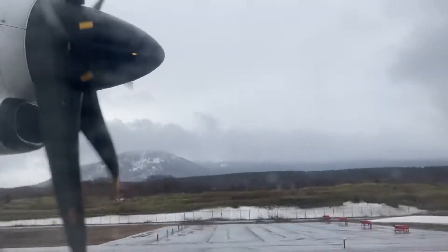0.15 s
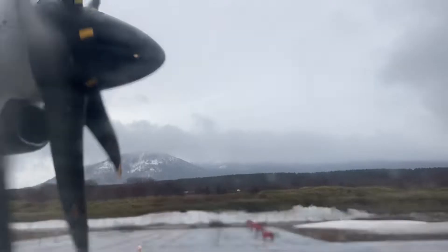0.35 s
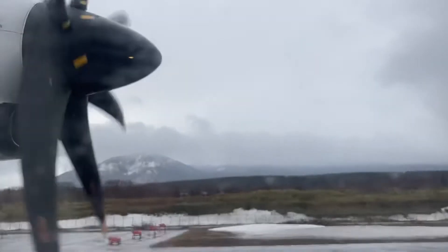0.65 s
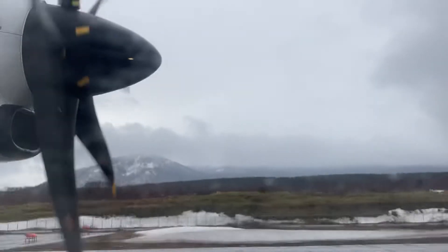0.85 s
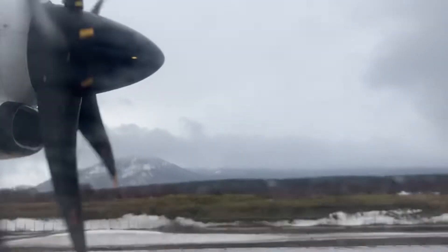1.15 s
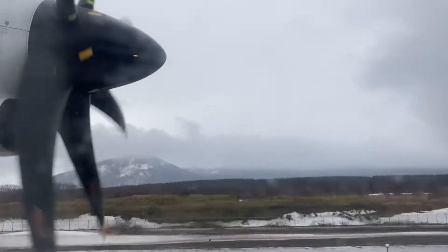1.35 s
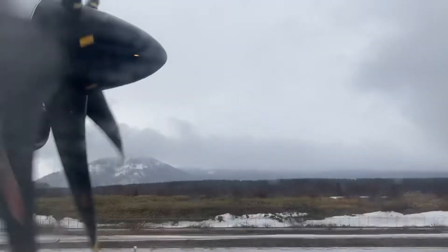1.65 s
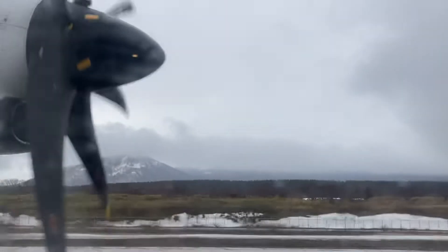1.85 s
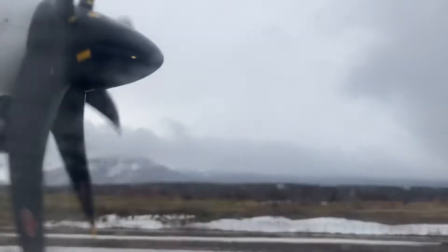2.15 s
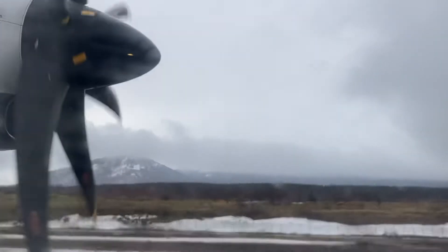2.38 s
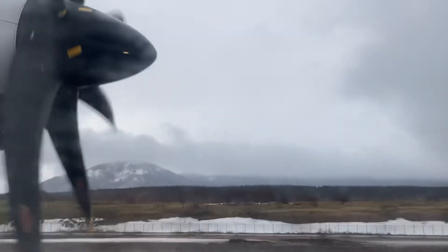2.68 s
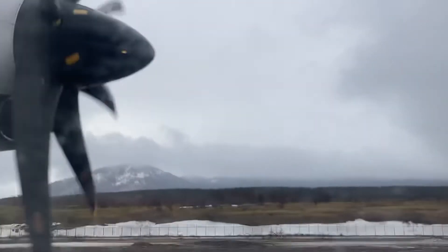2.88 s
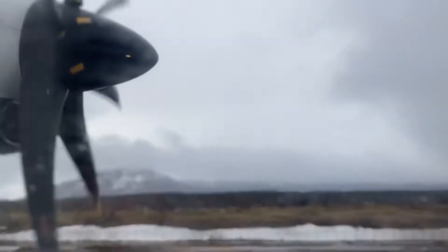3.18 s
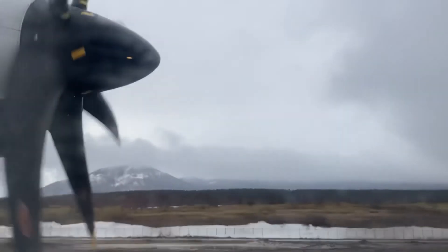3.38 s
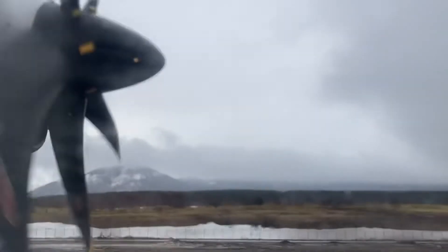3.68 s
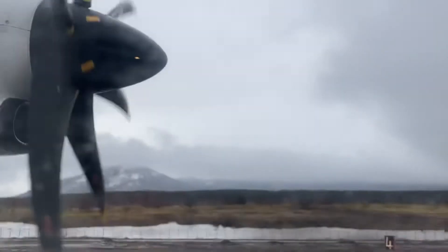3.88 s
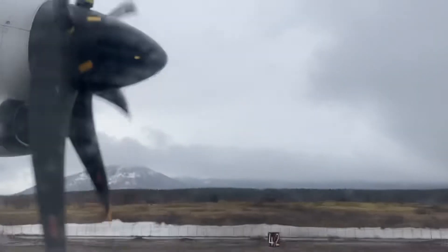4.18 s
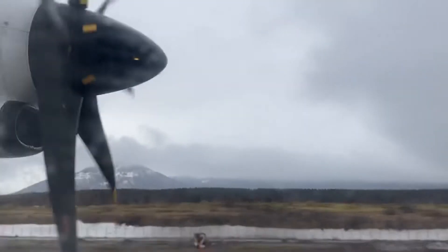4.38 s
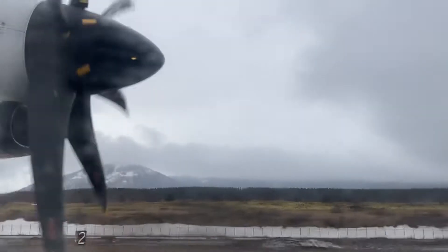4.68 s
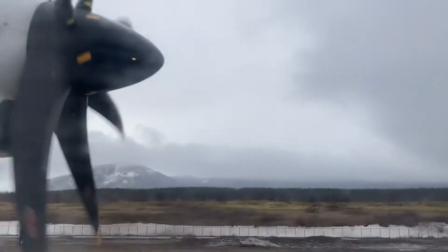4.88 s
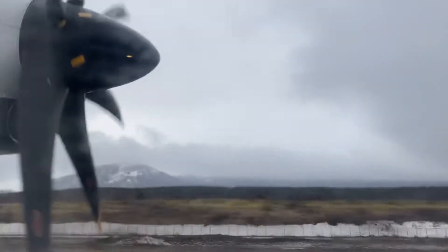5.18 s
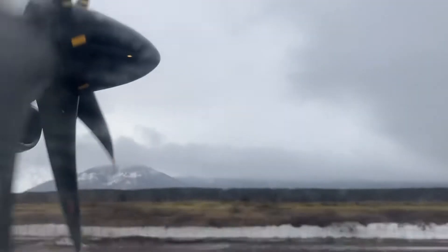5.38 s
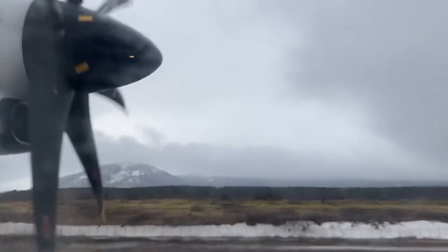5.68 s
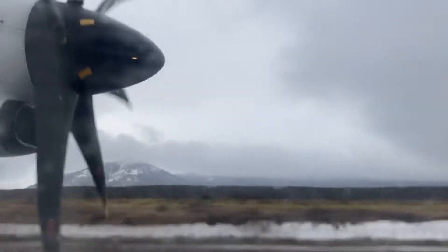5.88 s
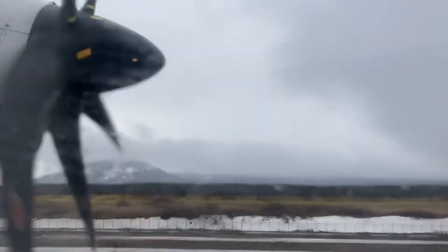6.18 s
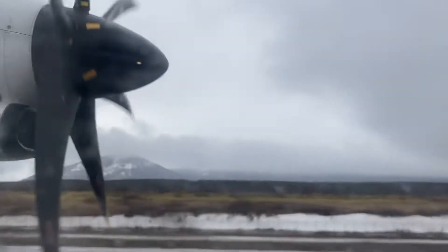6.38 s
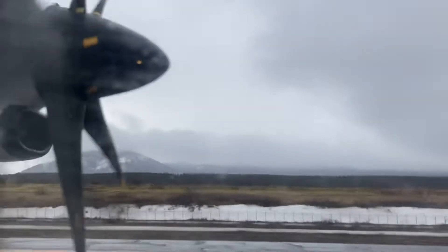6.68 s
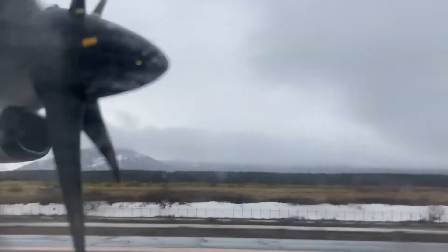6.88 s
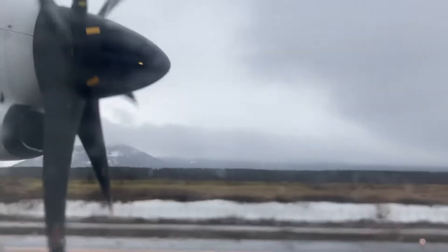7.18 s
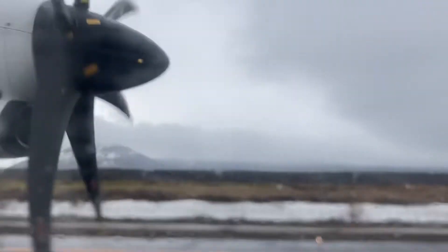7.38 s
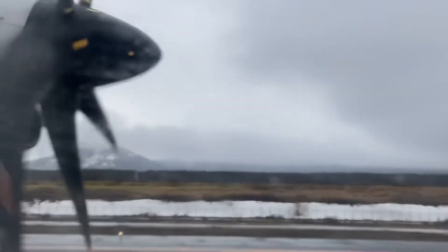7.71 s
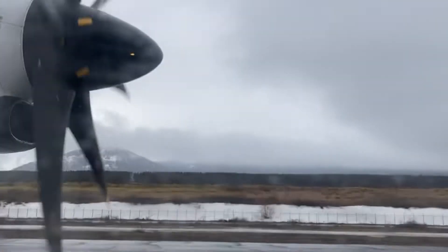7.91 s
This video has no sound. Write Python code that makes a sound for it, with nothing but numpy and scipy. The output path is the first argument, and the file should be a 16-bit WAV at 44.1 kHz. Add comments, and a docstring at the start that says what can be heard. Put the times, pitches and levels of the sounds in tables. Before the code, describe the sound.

A phone pressed to a cabin window picks up the continuous low roar of a propeller plane's wheels and engines on the runway. The engine tone pulses at first, then the propeller drone drops gradually in pitch. Dull wheel thumps come through the floor, mostly in the first half. Close by and slightly left, the loose pane knocks and the phone clicks against it throughout, with faint rushing air behind.

```python
"""The hull of a propeller airliner rumbles and hums as it rolls along the runway, heard from a phone held
against the window. Wheels, engines and airflow shake the hull, and the hollow double pane colours the left
microphone. The engine tone throbs, the propeller slows, and runway joints thump through the floor.
The pane rattles in its frame and the shaking phone ticks on it, over a thin hiss of rushing air."""
import sys
import numpy as np
from scipy import signal
from scipy.fft import rfft, irfft, next_fast_len
from scipy.io import wavfile
from scipy.ndimage import uniform_filter1d, minimum_filter1d, map_coordinates

SR = 44100
rng = np.random.default_rng(int(sys.argv[2]) if len(sys.argv) > 2 else 0)


def waveform_to_disk(signal):
    """Save audio, clipped to [-1, 1], as 16-bit WAV at the path in sys.argv[1]."""
    frames = np.transpose(np.atleast_2d(signal))
    scaled = np.clip(frames, -1, 1) * 32767
    samples = np.round(scaled).astype(np.int16)
    wavfile.write(sys.argv[1], SR, samples)


N = 355005

# Faders of the noise beds: time_s, rumble_db, body_db, pane_db, hiss_db
BED_FADERS = [(0, -12, -16.5, -23.5, -56), (.5, -16, -17, -23, -53.5), (.75, -19, -14, -20, -53),
              (1.1, -20, -12.5, -16.5, -52), (1.42, -19.5, -11.5, -18, -51.5), (1.6, -16, -17, -22.5, -57),
              (2.2, -15.5, -17, -24.5, -58), (2.55, -17.5, -18, -25, -58.5), (2.95, -17.5, -22, -28.5, -58),
              (3.3, -18, -20, -28, -62), (3.7, -12.5, -18.5, -25, -58.5), (3.88, -15, -21, -31.5, -62.5),
              (4.3, -17, -18.5, -26.5, -60), (4.65, -16.5, -19.5, -29.5, -59.5),
              (5.1, -12.5, -18, -28, -59.5), (5.7, -25, -15, -25.5, -57.5), (5.85, -14, -13.5, -28, -60),
              (6, -12.5, -8.5, -25.5, -48), (6.12, -15, -15.5, -32, -59), (6.45, -18, -19, -32.5, -62.5),
              (6.85, -20.5, -14.5, -29.5, -61.5), (7.1, -16, -15.5, -31.5, -61.5),
              (8.05, -18.5, -14, -31, -59.5)]
# Colour of the airflow: freq_hz, gain_db
HISS_EQ = [(1500, -34), (2500, 18), (3500, 17.5), (5000, 7), (7500, 0.5), (10000, -5), (12400, -1),
           (13600, -28.5), (17000, -49.5)]
# Swell of the phone sliding along the pane: time_s, level_db
RUB_FADER = [(2.7, -62), (2.8, -49), (2.9, -44), (3.02, -43.5), (3.06, -65.5)]
# Touches of the phone on the pane, as energies: start_s, snap_db, top_db, ring_db
PHONE_TOUCHES = [(0.226, -33, -36, -28), (0.398, -30, -29, -20), (0.41, -18.5, -14.5, -5),
                 (0.505, -36, -26.5, -19), (0.521, -21.5, -16, -19), (0.535, -3.5, -13.5, 4),
                 (0.642, -21.5, -33.5, -2.5), (0.658, -18.5, -25, -4), (1.307, -27, -27.5, -15),
                 (1.399, -20, -18, -14), (1.48, -8.5, -11.5, 1), (1.484, -8, -2.5, 6),
                 (1.494, -26, -19.5, -12), (1.584, -3.5, 2.5, 2), (1.587, -11, 0, -11),
                 (1.601, -37, -25, -13), (1.611, -29, -21, -22), (1.614, -19, -14, -22.5),
                 (1.627, -32, -27, -25), (1.636, -33.5, -18, -23), (1.641, -34, -18.5, -23),
                 (1.656, -32, -11.5, -19), (1.881, -34, -28, -8), (1.91, -23, -19.5, -12),
                 (1.94, -32, -25, -20), (1.964, -21, -16, -17), (2.106, -36, -36, -13),
                 (2.221, -32, -22, -20), (2.226, -19, -17, -9), (2.233, -4.5, -9, -1.5),
                 (2.242, -10.5, -11, 9), (2.294, -30, -27, -16), (2.301, -25, -27.5, -7),
                 (2.306, -30.5, -17.5, -4), (2.378, -34, -26, -11), (2.394, -20, -22, -6),
                 (2.428, -18.5, -25.5, -5), (2.641, -20.5, -30, -4), (2.644, -19.5, -14.5, 1),
                 (2.754, -34, -23, -19), (3.027, -24, -23.5, -7), (3.033, -22, -42.5, -7),
                 (3.045, -20.5, -12, 4.5), (3.051, -21, -33, -15), (3.062, -24, -9, 3.5),
                 (3.081, -27.5, -8.5, 2), (3.099, -29, -13, -1), (3.143, -38, -15.5, -5),
                 (3.229, -30, -28, -18), (3.248, -18, -30.5, -11), (3.264, -26.5, -31, -13),
                 (3.345, -24.5, -23.5, -21.5), (3.441, -23.5, -27, -21), (3.46, -27, -15, -2),
                 (3.48, -15, -17, -21), (3.699, -21, -14.5, -5), (3.75, -21, -20.5, 4),
                 (3.757, -21, -37, -10), (3.763, -7.5, -4.5, -2), (3.771, -10.5, -15.5, 1.5),
                 (3.776, -15, -25, -10), (3.785, -10, -4, 3), (3.792, -6.5, -22, 4), (3.84, -29, -30, -12),
                 (3.86, -32, -35, -11), (3.896, -35, -35, -6.5), (4.036, -32, -33, -13),
                 (4.067, -35, -37, -12), (4.112, -28.5, -31, -9), (4.128, -25, -32, -7.5),
                 (4.158, -32, -32, -11), (4.222, -31, -36, -17), (4.244, -28, -36, -10),
                 (4.347, -26, -43, -25), (4.444, -26.5, -50, -3), (4.462, -21, -34, -14),
                 (4.474, -25.5, -37, -16), (4.482, -23, -39, -13), (4.493, -19, -24, -4.5),
                 (4.5, -27, -34, -14), (4.507, -24, -43, -12), (4.516, -18, -33, -16), (4.53, -23, -13, 0),
                 (4.599, -19, -40, -32), (4.618, -17, -30.5, -18), (4.631, -23, -40, -24),
                 (4.661, -16.5, -46, -7), (4.671, -24, -41, -20), (4.682, -21.5, -36, -24),
                 (4.693, -17, -38.5, -13), (4.7, -26, -37, -20), (4.713, -28, -41, -20),
                 (4.777, -15, -20, 0), (4.799, -25, -40, -6), (5.032, -29, -31.5, -14),
                 (5.148, -28, -39, -20), (5.162, -12.5, -35, -6), (5.193, -20.5, -33, -25),
                 (5.201, -18, -47, -15), (5.209, -20, -39, -18), (5.215, -16, -24, 0),
                 (5.243, -19, -41, -12), (5.278, -17.5, -19.5, -0.5), (5.302, -20, -25, -4.5),
                 (5.314, -26.5, -33, -3), (5.331, -29, -38, -18), (5.366, -15.5, -24.5, -2.5),
                 (5.411, -19.5, -26, -3), (5.462, -17, -26, -1), (5.473, -30, -32.5, -6.5),
                 (5.486, -27, -32.5, -1), (5.518, -16.5, -27, -2), (5.527, -21, -32, 0.5),
                 (5.541, -20, -33.5, -10), (5.551, -21, -25, 0.5), (5.561, -25, -29.5, -16),
                 (5.588, -26, -32, -8), (5.611, -25, -21.5, -6), (5.868, -32, -35.5, -22),
                 (5.89, -19.5, -28.5, -12), (5.961, -22, -38, -17), (5.972, -22, -25.5, -10),
                 (5.978, -18, -24, -14), (5.995, -26, -30, -14), (6.004, -9, -45, -5),
                 (6.013, -24, -37, -16), (6.023, -17, -31, -1), (6.03, -15.5, -38.5, 3.5),
                 (6.035, -14, -32, -12), (6.04, -10, -8, 5.5), (6.047, -19, -17, -14),
                 (6.053, -28, -29, -16), (6.061, -14, -24.5, -7), (6.073, -14, -27, -12),
                 (6.076, -17, -15.5, 1), (6.115, -24, -39, -19), (6.138, -22, -37, -16),
                 (6.196, -21.5, -41, -20), (6.205, -21, -43, -27), (6.263, -18, -34.5, -20),
                 (6.297, -26, -37.5, -15), (6.31, -20, -38, -17), (6.321, -24, -35, -20),
                 (6.334, -21, -35.5, -16), (6.934, -30, -31, -20), (6.957, -31, -30, -21),
                 (6.981, -21.5, -39, -35), (7.019, -13, -39, -5.5), (7.04, -17, -35, -9),
                 (7.065, -36, -38, -20), (7.074, -32, -36, -20), (7.082, -29, -35, -18),
                 (7.109, -35.5, -25, -8), (7.123, -36.5, -37, -7), (7.133, -34, -15, -2),
                 (7.145, -34, -29.5, -8.5), (7.212, -20.5, -39.5, -26), (7.22, -24.5, -44, -18),
                 (7.236, -26, -40, -24), (7.246, -25, -43, -18), (7.258, -27, -45, -24),
                 (7.281, -29, -45, -29), (7.322, -16.5, -23, -2), (7.326, -30, -24, -3),
                 (7.333, -22, -28, -8), (7.337, -30, -21, -3), (7.344, -26, -30, 1.5),
                 (7.349, -25.5, -25.5, -14), (7.357, -22, -26, -4), (7.361, -27, -12, -6),
                 (7.367, -34, -20.5, -14), (7.374, -30, -21, -11), (7.398, -39, -22.5, -8),
                 (7.41, -34, -23, -13.5), (7.441, -24, -41, -18), (7.501, -16, -31, -12),
                 (7.51, -23, -38, -16), (7.524, -19, -37, -10), (7.547, -15.5, -26, -0.5),
                 (7.603, -34, -30, -13), (7.62, -26.5, -32, -6), (7.635, -29, -38, -12),
                 (7.671, -22, -31, -6), (7.683, -24.5, -31.5, -4), (7.752, -20.5, -28, -4),
                 (7.788, -20, -31, -2.5), (7.815, -27, -36, -10), (7.826, -31, -41, -6),
                 (7.885, -36, -42, -22), (7.918, -28, -47, -25), (7.967, -21, -36, -16)]
# Snap of the phone shell: freq_hz, width_hz, gain_db
SHELL_MODES = [(4930, 200, -8.5), (7640, 1100, -13.5)]
# The shell's two top modes: freq_hz, width_hz, gain_db
SHELL_TOP_MODES = [(11940, 8800, 0), (15300, 2000, 0)]
# The shifting grip tilts the balance of the top modes: time_s, toward_upper_db
GRIP_TILT = [(0, 2), (2.6, 1.5), (3, -7), (3.5, -3.5), (3.8, 1.5), (4.2, 0.5), (6.8, -2.5), (7.2, -1.5),
             (8.05, 0)]
# Ring of the gap between phone and pane: freq_hz, width_hz, gain_db
GAP_MODES = [(3980, 1200, -3.5), (2380, 1050, 0)]
# Knocks of the pane in its frame: start_s, energy_db
PANE_KNOCKS = [(0.536, 7.5), (1.15, 5), (1.481, 12.5), (1.585, 15), (1.591, 8.5), (2.24, 6), (2.641, 6),
               (3.031, 10.5), (3.044, 11.5), (3.051, 15), (3.059, 14.5), (3.098, 2.5), (3.748, 9.5),
               (3.755, 14), (3.766, 11.5), (3.792, 18), (4.081, 3), (4.192, -1), (4.213, 5), (4.234, 6),
               (4.318, -3.5), (4.445, 11.5), (4.464, 7), (4.473, 5.5), (4.774, 0), (5.111, -1),
               (5.575, 11.5), (5.694, 5.5), (5.725, 5.5), (5.784, 0), (5.871, 11.5), (5.892, 14),
               (5.927, 2), (5.994, 12.5), (6.027, 13.5), (6.03, 12.5), (6.132, 3.5), (6.175, 0),
               (6.277, 8.5), (6.301, 3.5), (6.923, 0), (6.937, -1.5), (6.947, 1), (6.962, 3), (6.985, 7.5),
               (7.022, 7), (7.046, 5.5), (7.082, 6.5), (7.151, 1.5), (7.204, 2.5), (7.216, 3.5),
               (7.287, 5.5), (7.325, 3.5), (7.382, 3), (7.422, 0.5), (7.431, 1.5), (7.722, 4), (7.804, 5.5),
               (7.866, 4), (7.915, 1), (7.937, 2), (7.948, 1.5), (8.02, 5), (8.043, 8.5)]
# Colour of a knock: freq_hz, gain_db
KNOCK_EQ = [(250, -24.5), (550, 13), (900, 5), (1300, 3), (1900, -1), (2550, 1), (3100, -10), (4000, -14.5),
            (4800, -26), (8000, -45.5)]
# Air modes inside the double pane: freq_hz, width_hz, gain_db
PANE_MODES = [(646, 64, 4.5), (851, 53, 3.5), (1078, 39.5, 2), (1434, 68, -3), (1736, 89, -7.5),
              (2113, 68, -4), (2344, 48, -3), (2586, 51, -2.5), (2945, 64, -11.5), (3420, 190, -23.5)]
# Blows from the runway joints: start_s, level_db, rise_ms
RUNWAY_JOINTS = [(0.0363, -7, 2), (1.752, -4.5, 2), (2.057, -2, 3), (2.2968, -7, 3.6), (2.4562, -1.5, 4.4),
                 (3.061, -0.5, 1.7), (3.1944, 0.5, 4.3), (3.439, -8, 3.4), (3.596, -1.5, 1.9),
                 (3.712, -6.5, 4), (3.756, -7.5, 1.7), (3.7762, 8, .8), (4.444, -4, 3.1), (4.69, -11, 3.8),
                 (5.965, 0.5, 2.7), (5.989, -7.5, 2.7)]
# Fuzzy hum of the hull: time_s, level_db
HULL_HUM_FADER = [(0, -11), (1.4, -11), (2.1, -23.5), (2.5, -23.5), (2.8, -12), (3.7, -17.5), (4.3, -25),
                  (4.8, -19.5), (5.5, -15.5), (6.4, -26.5), (7.4, -19.5), (8.05, -16)]
# Sinking hum at the opening: time_s, pitch_hz, level_db
SINKING_HUM = [(0, 141, -9), (.3, 140, -22.5), (.5, 138.7, -12), (.8, 137.6, -22.5), (1.1, 137, -14.5),
               (1.5, 133.4, -13.5), (1.75, 131, -29)]
# Clear engine tone: time_s, pitch_hz, level_db
ENGINE_TONE = [(.2, 194.8, -30.5), (.9, 205.9, -17.5), (1.5, 206.5, -21), (2.5, 200.3, -19.5),
               (3, 198.6, -29), (3.9, 194.7, -26)]
# Blade passing tone of the slowing propeller: time_s, pitch_hz, level_db
BLADE_TONE = [(3.8, 98.7, -10.5), (4.15, 95.26, -16.5), (5.1, 93.5, -26), (5.5, 92, -13), (6.2, 89, -20.5),
              (6.85, 84.5, -28), (7.15, 83.97, -20), (8.05, 83.5, -17.5)]
# Deep end of the hull's roar: freq_hz, gain_db
RUMBLE_EQ = [(12, -49), (20, -23.5), (70, 2), (200, -8), (260, -17), (440, -120)]
# Low-mid body of the roar: freq_hz, gain_db
BODY_EQ = [(90, -13.5), (130, 1), (200, -2), (270, -3), (400, -3), (480, -4.5), (560, -14), (800, -20.5),
           (1300, -30.5), (2200, -39), (4000, -85), (6000, -97)]
# Likeness of left and right in the roar: freq_hz, correlation
STEREO_LIKENESS = [(40, 0.45), (100, 0.87), (200, 0.9), (400, 1), (700, 0.42), (1200, 0.27)]
# The left microphone port hears the bass first: freq_hz, lead_rad
LEFT_LEAD = [(60, .3), (340, .5), (600, .8), (900, 0)]
# Treble dips and peaks of the microphone ports: freq_hz, gain_db
PORT_EQ = [(8200, 0.5), (9300, -5), (10500, 1.5), (13000, 1.5), (13800, -4), (14500, 5), (15800, -8),
           (16700, -13.5)]


def amp(db):
    return 10 ** (np.asarray(db) / 20)


def unit_rms(x):
    return x / np.sqrt(np.mean(x ** 2) + 1e-20)


def along(points, hz):
    """Read (freq_hz, value) points on a log frequency axis."""
    freqs, values = np.transpose(points)
    return np.interp(np.log(hz + 1), np.log(freqs + 1), values)


def automation(rows):
    """One curve, sample by sample, for each column after the time."""
    time_s, *columns = np.transpose(rows)
    return [np.interp(np.arange(N) / SR, time_s, column) for column in columns]


def wobble(rate_hz):
    """A smooth random curve with rate_hz knots a second."""
    knots = rng.standard_normal(int(N * rate_hz / SR) + 4)
    return map_coordinates(knots, [np.arange(N) * rate_hz / SR])


def filtered(x, response):
    """Filter x by a complex response, given as a function of frequency."""
    size = next_fast_len(N + SR // 2)
    return irfft(rfft(x, size) * response(np.fft.rfftfreq(size, 1 / SR)), size)[..., :N]


def resonators(modes, passes=1):
    """Response of a bank of resonances of alternating polarity; two passes steepen the skirts."""
    return lambda hz: sum((-1) ** k * amp(db) * 1j * hz * width / (centre**2 - hz**2 + 1j * hz * width)
                          for k, (centre, width, db) in enumerate(modes)) ** passes


def patchy_noise(depth_db):
    """Two white noises sharing random patches of gain in time and frequency."""
    spectra = signal.stft(rng.standard_normal((2, N)), nperseg=512)[2]
    patches = rng.standard_normal(spectra.shape[1:])
    patches = uniform_filter1d(uniform_filter1d(patches, 6, axis=0), 10, axis=1)
    return signal.istft(spectra * amp(depth_db * unit_rms(patches)), nperseg=512)[1][:, :N]


def stereo_bed(eq, patchy_db):
    """Coloured stereo noise of rms 1, narrow in the low mids and wider below and above."""
    def mid_side(hz):
        angle = np.arccos(np.clip(along(STEREO_LIKENESS, hz), -1, 1)) / 2
        return amp(along(eq, hz)) * [np.cos(angle), np.sin(angle)]
    mid, side = filtered(patchy_noise(patchy_db), mid_side)
    return unit_rms(np.array([mid + side, mid - side]))


def bursts(start_s, energy_db, response, rise_s, fall_s, size=512):
    """Short noise bursts that swell and die, coloured and then scaled to a set energy."""
    t = np.arange(size) / SR
    envelope = (1 - np.exp(-(t / rise_s) ** 2)) * np.exp(-(t / fall_s) ** 2)
    grains = rng.standard_normal((len(start_s), size)) * envelope
    grains = irfft(rfft(grains) * response(np.fft.rfftfreq(size, 1 / SR)), size)
    grains *= (amp(energy_db) / np.linalg.norm(grains, axis=1))[:, None]
    positions = np.round(start_s * SR).astype(int)[:, None] + np.arange(size)
    return np.bincount(positions.ravel(), grains.ravel(), N + size)[:N]


def tone(rows, drift_rad, flutter_db, pan_left_db=0):
    """A sine on a pitch curve, with wandering phase and level, faded at both ends."""
    pitch_hz, level_db = automation(rows)
    t = np.arange(N) / SR
    fade = np.clip(np.minimum(t - rows[0][0] + 0.036, rows[-1][0] + 0.0081 - t) / 0.0099, 0, 1)
    wave = np.sqrt(2) * np.sin(2 * np.pi * np.cumsum(pitch_hz) / SR + drift_rad * wobble(10))
    return fade * amp(level_db + flutter_db * wobble(12)) * wave * amp([[pan_left_db], [-pan_left_db]])


def at_both_ports(x, left_delay_s=.0002185):
    """Treble as the two ports hear it: alike, but late and inverted on the left."""
    return np.array([filtered(x, lambda hz: -np.exp(-2j * np.pi * hz * left_delay_s)), x])


def at_left_port(x, right_db, turn_rad):
    """A source beside the left port: the right one hears it weaker and turned in phase."""
    return np.array([x, amp(right_db) * filtered(x, lambda hz: np.exp(1j * turn_rad))])


def airflow_hiss(trim_db=10.5, shared_db=-9):
    """Air rushing past: a wide, flickering hiss with a small part common to both ports."""
    white = rng.standard_normal((3, N))
    air = white[1:] + amp(shared_db) * at_both_ports(white[0])
    level_db = automation(BED_FADERS)[3] + trim_db + 1.3 * wobble(40)
    return amp(level_db) * unit_rms(filtered(air, lambda hz: amp(along(HISS_EQ, hz))))


def phone_rub(right_db=-5):
    """The phone slides along the pane: one short, grainy swell of friction noise."""
    friction = unit_rms(filtered(rng.standard_normal(N), resonators([(3300, 2000, 0)], passes=2)))
    level_db = automation(RUB_FADER)[0] + 1.5 * wobble(67)
    return amp(level_db) * friction * amp([[0], [right_db]])


def with_faint_touches(touches, scatter_s=.03, caps_db=(-36, -41, -23), spread_db=3):
    """Scatter two faint touches around each listed one; return the times and the three energies."""
    start_s, *energies = np.transpose(touches)
    jitter = rng.standard_normal((len(start_s), 2, 4))
    faint_s = np.clip(start_s[:, None] + scatter_s * jitter[..., 0], .01, N / SR)
    columns = [np.append(start_s, faint_s)]
    for k, (energy_db, cap_db) in enumerate(zip(energies, caps_db), start=1):
        faint_db = np.minimum(energy_db[:, None], cap_db) + spread_db * jitter[..., k]
        columns.append(np.append(energy_db, faint_db))
    return columns


def phone_ticks():
    """The phone taps the pane: its shell snaps in both ports, then the gap rings at the left one."""
    start_s, snap_db, top_db, ring_db = with_faint_touches(PHONE_TOUCHES)
    snap_s = start_s - .0008
    snap = bursts(snap_s, snap_db, resonators(SHELL_MODES), rise_s=.00027, fall_s=.0023)
    tilt_db = np.interp(start_s, *np.transpose(GRIP_TILT)) / 2
    for mode, mode_db in zip(SHELL_TOP_MODES, (top_db - tilt_db - 3, top_db + tilt_db - 6)):
        snap += bursts(snap_s, mode_db, resonators([mode], passes=2), rise_s=.00038, fall_s=.0013)
    ring = bursts(start_s - .0004, ring_db, resonators(GAP_MODES), rise_s=.00077, fall_s=.0011)
    return at_both_ports(snap) + at_left_port(ring, right_db=-17.5, turn_rad=-1.43)


def pane_rattle(heavy_above_db=12, crack_db=-8.5, ring_db=-13.5):
    """The loose pane knocks its frame: a crack and a rough clack that set its air modes ringing."""
    def colour(hz):
        return amp(along(KNOCK_EQ, hz)) * np.exp(-2j * np.pi * hz * lead_s)
    lead_s = .001  # bursts start early and the filter delays them, leaving room for its pre-ring
    start_s, energy_db = np.transpose(PANE_KNOCKS)
    fall_s = np.where(energy_db > heavy_above_db, .007, .0042)[:, None]  # heavy knocks clack longer
    clack = bursts(start_s - lead_s, energy_db, colour, rise_s=.0012, fall_s=fall_s, size=2048)
    crack = bursts(start_s - lead_s, energy_db + crack_db, colour, rise_s=.00053, fall_s=.0016, size=2048)
    knocks = clack + crack
    ring = amp(ring_db) * filtered(knocks, resonators(PANE_MODES))
    return at_left_port(knocks + ring, right_db=-10, turn_rad=1.0)


def window_recess(knocks, t60_s=0.09, wet_db=-4.5):
    """The window recess answers each knock with a brief noisy tail."""
    t = np.arange(SR // 10) / SR
    tail = rng.standard_normal((2, len(t))) * amp(-60 * t / t60_s)
    tail /= np.linalg.norm(tail[0])
    return knocks + amp(wet_db) * signal.fftconvolve(knocks, tail, axes=1)[:, :N]


def runway_thumps(settle_hz=109.3, sweep_hz=1517, glide_s=0.00209, length_s=0.014):
    """A joint's blow spreads as a bending wave: the highs arrive first, so the pitch dives."""
    track = np.zeros(N + SR)
    t = np.arange(SR // 20) / SR
    pitch_hz = settle_hz + sweep_hz / (1 + t / glide_s) ** 2
    dive = -np.cos(2 * np.pi * np.cumsum(pitch_hz) / SR) * np.exp(-(t / length_s) ** 4)
    for start_s, level_db, rise_ms in RUNWAY_JOINTS:
        attack = 1 - np.exp(-(t * 1000 / rise_ms) ** 2)
        track[round(start_s * SR):][:len(t)] += amp(level_db) * dive * attack
    return track[:N]


def engine_drone(beat_hz=4.4, beat_peak_s=1.6, beat_depth=0.37):
    """Engine and propeller tones; the two engines run slightly apart, so their tone throbs."""
    sinking = tone(SINKING_HUM, drift_rad=.3, flutter_db=2.5)
    engine = tone(ENGINE_TONE, drift_rad=.45, flutter_db=1.2)
    blades = tone(BLADE_TONE, drift_rad=.2, flutter_db=4.0, pan_left_db=0.5)
    throb = 1 + beat_depth * np.cos(2 * np.pi * beat_hz * (np.arange(N) / SR - beat_peak_s))
    return sinking + throb * engine + blades


def hull_hum(pitch_hz=66, width_hz=18):
    """Noise drives one low hull resonance into a fuzzy hum, leaning left."""
    noise = rng.standard_normal((3, N))
    drive = noise[0] + 0.56 * noise[1:]
    hum = unit_rms(filtered(drive, resonators([(pitch_hz, width_hz, 0)], passes=2)))
    return amp(automation(HULL_HUM_FADER)[0] + [[1.1], [-1.1]]) * hum


def hull_roar():
    """Wheels, engines and airflow shake the hull; the double pane rings along by the left port."""
    rumble_db, body_db, pane_db = automation(BED_FADERS)[:3]
    shake = wobble(7.6)
    rumble = amp(rumble_db + 0.55 * wobble(9.2) + [[1.1], [-1.1]]) * stereo_bed(RUMBLE_EQ, patchy_db=0.5)
    body = amp(body_db + 0.79 * shake) * stereo_bed(BODY_EQ, patchy_db=2.0)
    flutter_db = .5 * shake + .6 * wobble(25)
    hollow = unit_rms(filtered(patchy_noise(depth_db=1.27), resonators(PANE_MODES)))
    pane, right_fill = amp(pane_db + flutter_db) * hollow
    pane = at_left_port(pane, right_db=-17, turn_rad=1.4) + right_fill * [[0], [amp(-11.5)]]
    return rumble + body + pane


def scene():
    """The hull's low layers, leading on the left, under the hiss and the small noises at the window."""
    hull = hull_roar() + hull_hum() + engine_drone() + runway_thumps()
    hull = filtered(hull, lambda hz: np.exp(.5j * along(LEFT_LEAD, hz) * np.array([[1], [-1]])))
    return hull + airflow_hiss() + phone_rub() + phone_ticks() + window_recess(pane_rattle())


def record(dry, ceiling=.89, hold_s=.005, release_db_per_s=79, top_hz=16700):
    """A limiter ducks the peaks and releases steadily; the ports colour the treble, cut off at top_hz."""
    hold = round(hold_s * SR)
    over_db = np.maximum(0, 20 * np.log10(np.abs(dry).max(0) / ceiling + 1e-9))
    held_db = -minimum_filter1d(-over_db, size=hold)
    release_db = release_db_per_s * np.arange(N) / SR
    duck_db = np.maximum.accumulate(held_db + release_db) - release_db
    duck_db = uniform_filter1d(duck_db, size=hold - 1)
    return filtered(dry * amp(-duck_db), lambda hz: amp(along(PORT_EQ, hz)) * (hz < top_hz))


dry = scene()
out = record(dry)
waveform_to_disk(out)
```